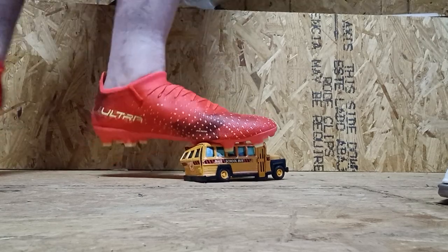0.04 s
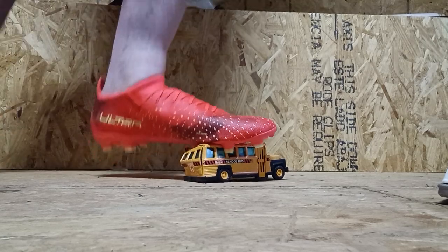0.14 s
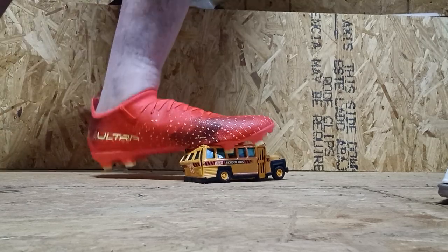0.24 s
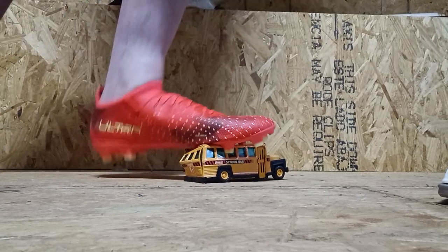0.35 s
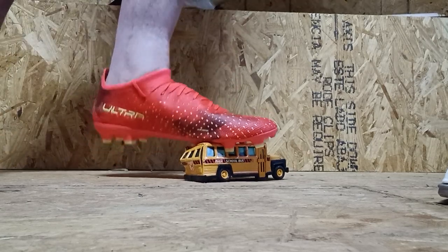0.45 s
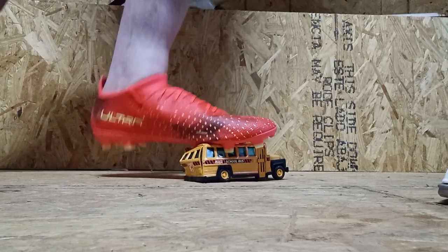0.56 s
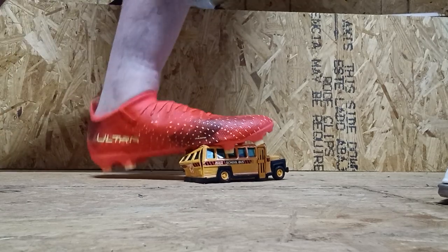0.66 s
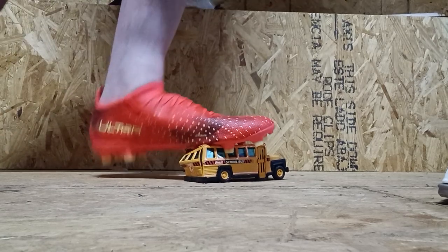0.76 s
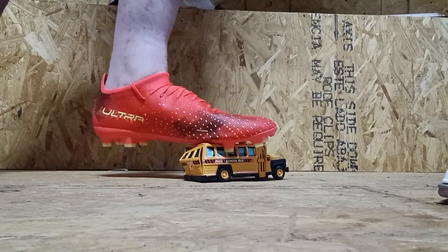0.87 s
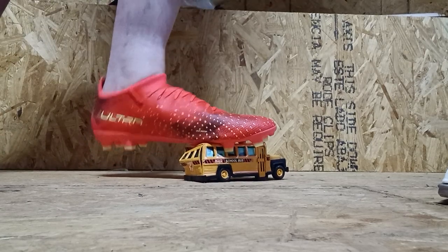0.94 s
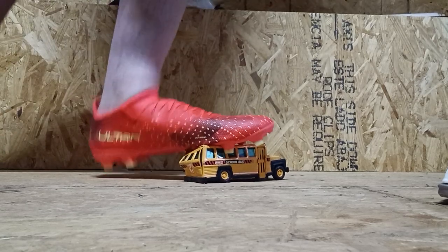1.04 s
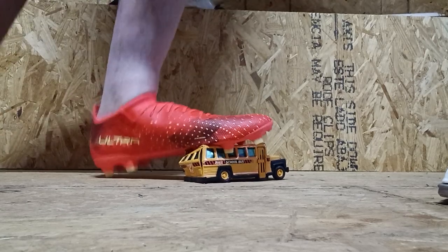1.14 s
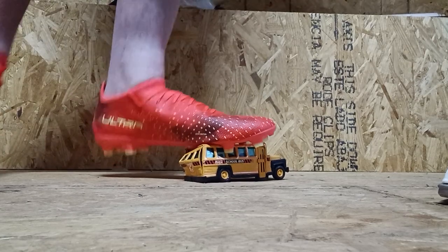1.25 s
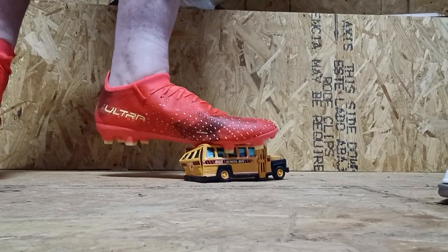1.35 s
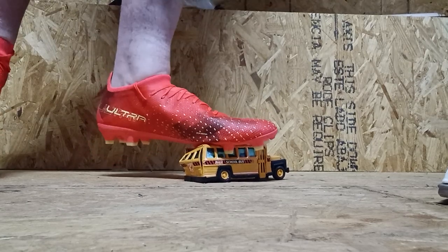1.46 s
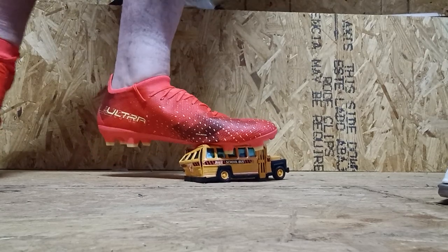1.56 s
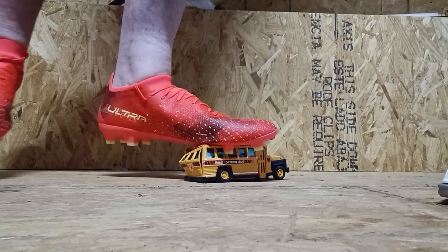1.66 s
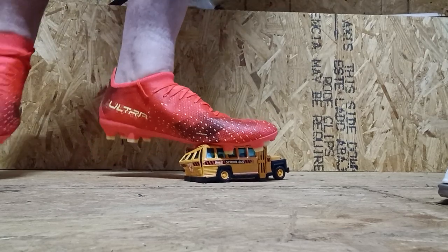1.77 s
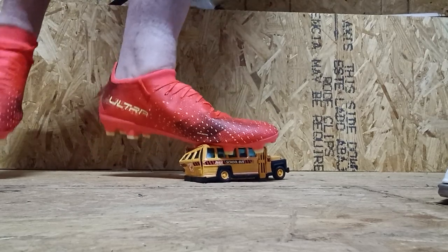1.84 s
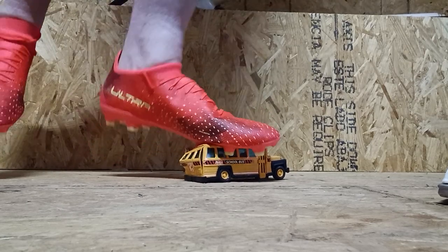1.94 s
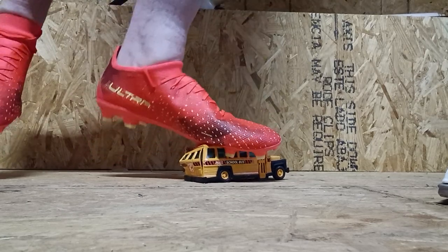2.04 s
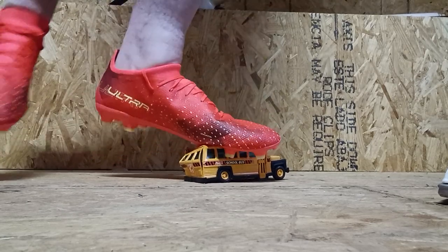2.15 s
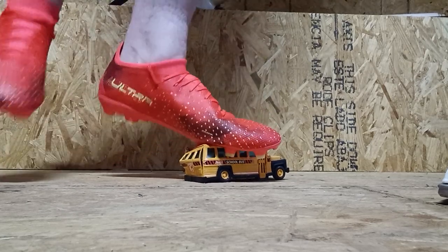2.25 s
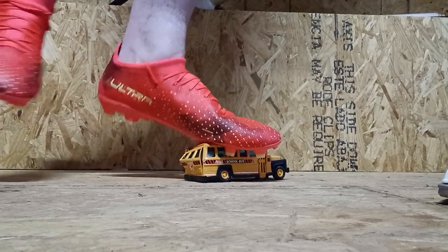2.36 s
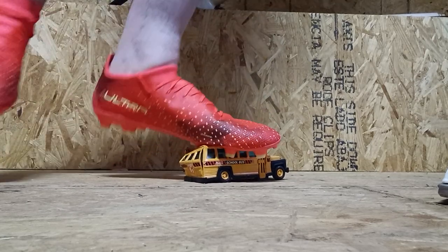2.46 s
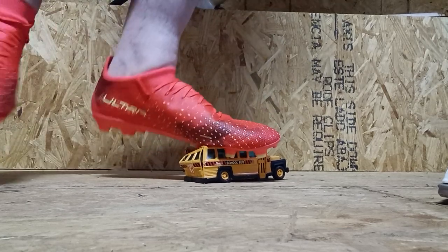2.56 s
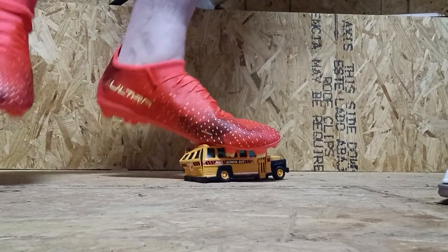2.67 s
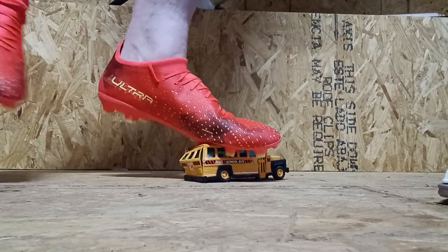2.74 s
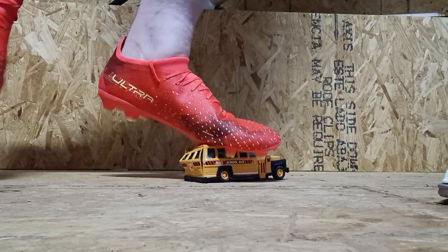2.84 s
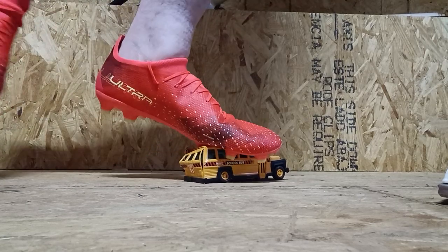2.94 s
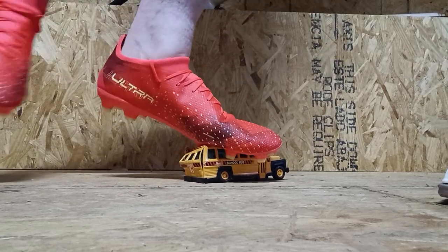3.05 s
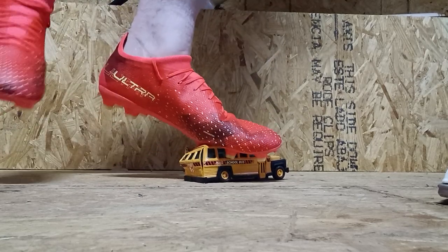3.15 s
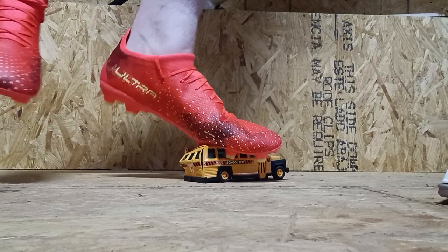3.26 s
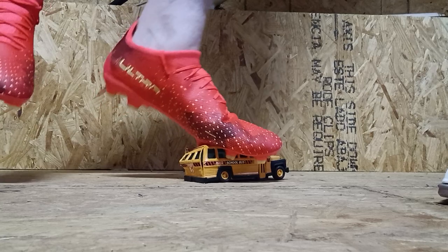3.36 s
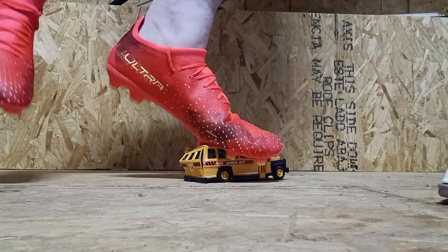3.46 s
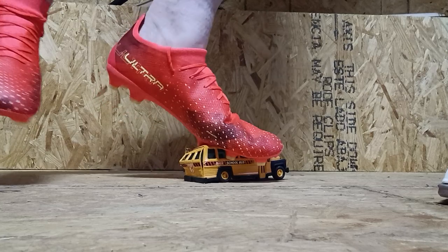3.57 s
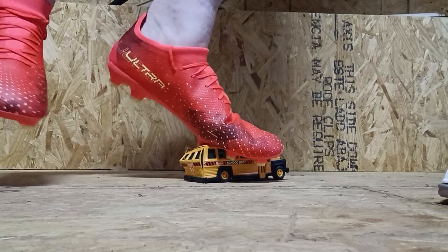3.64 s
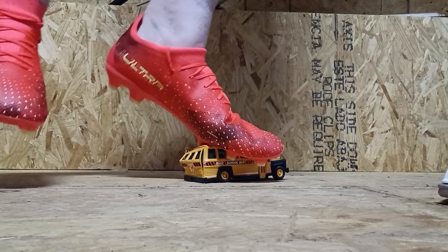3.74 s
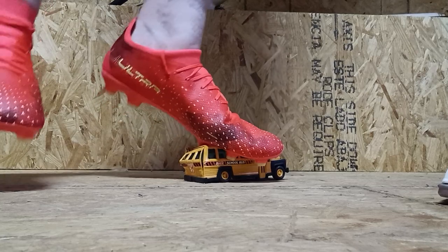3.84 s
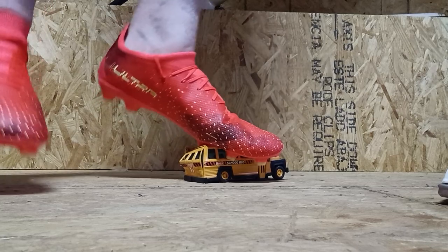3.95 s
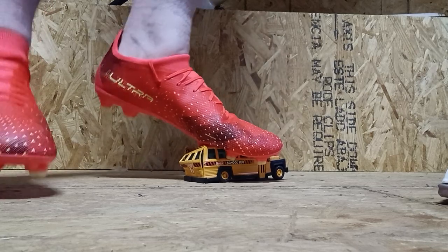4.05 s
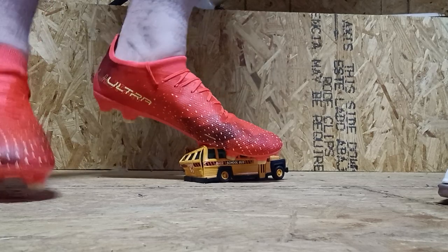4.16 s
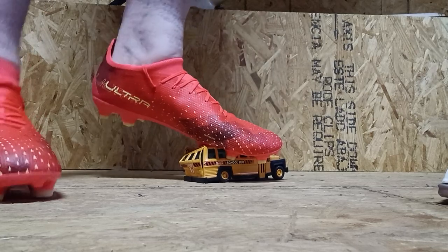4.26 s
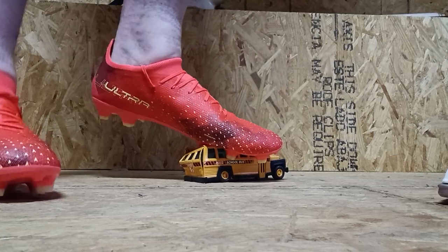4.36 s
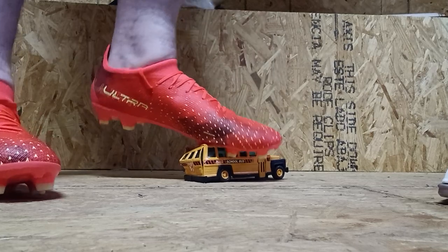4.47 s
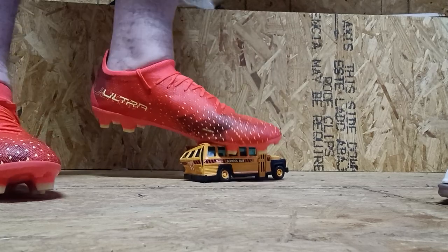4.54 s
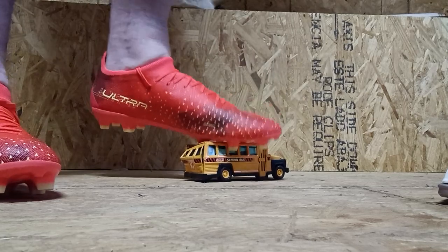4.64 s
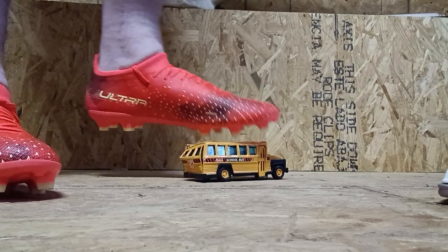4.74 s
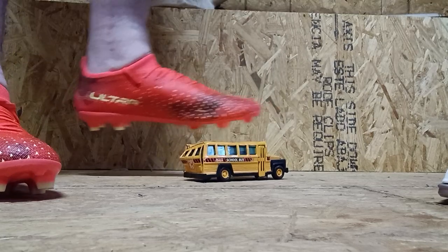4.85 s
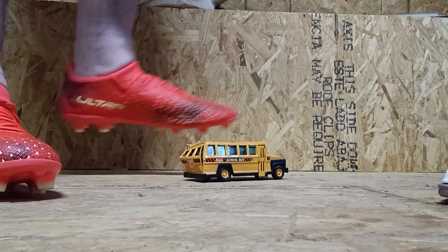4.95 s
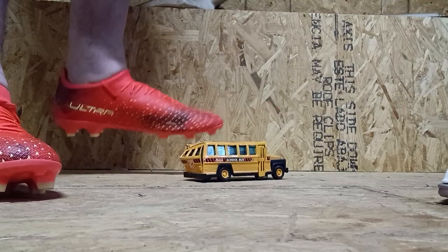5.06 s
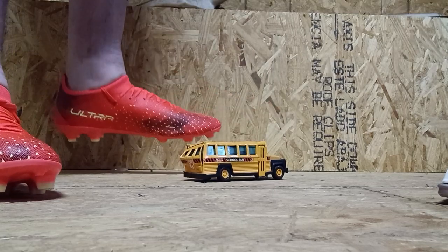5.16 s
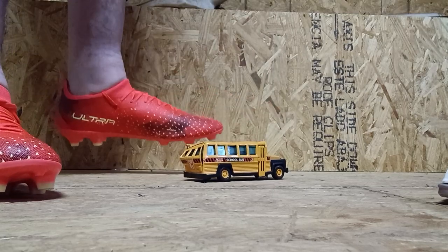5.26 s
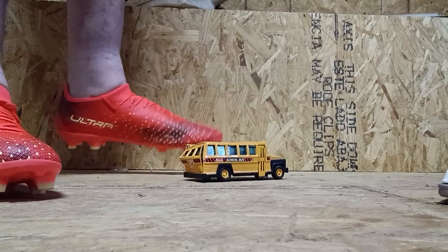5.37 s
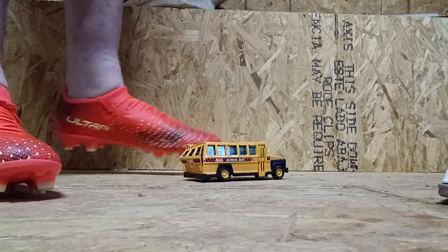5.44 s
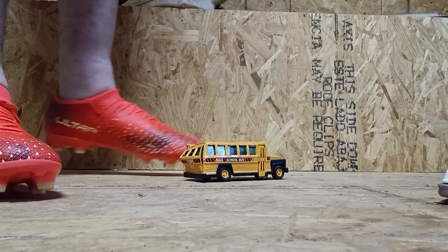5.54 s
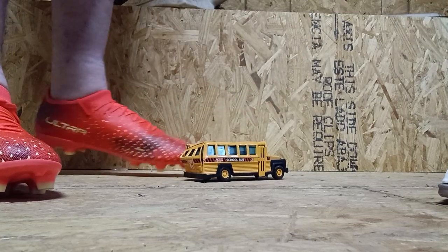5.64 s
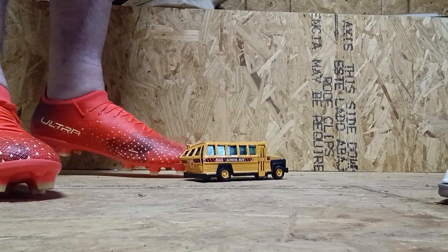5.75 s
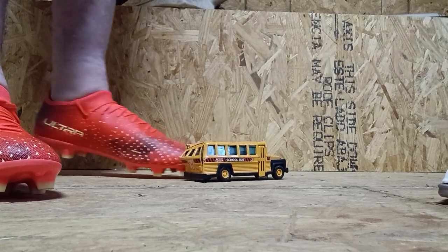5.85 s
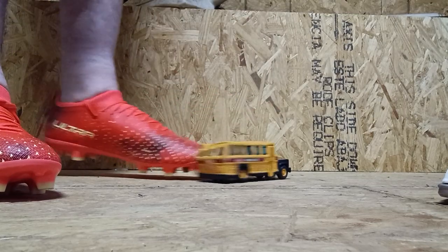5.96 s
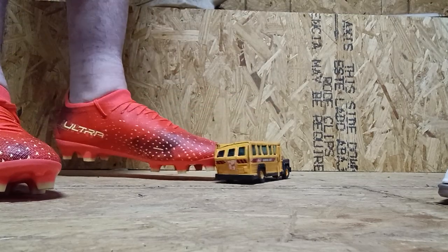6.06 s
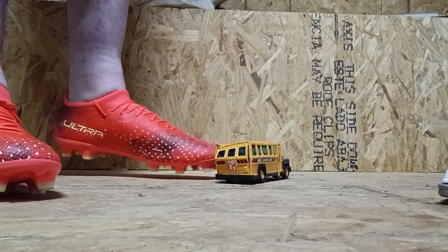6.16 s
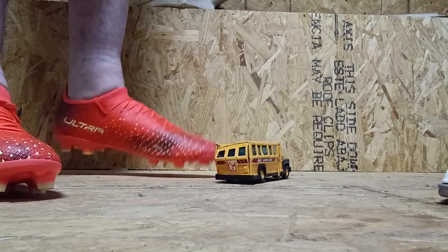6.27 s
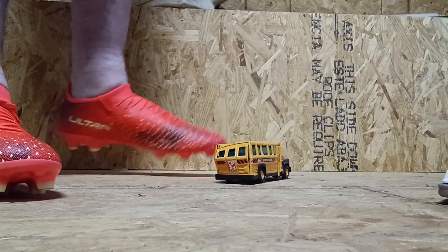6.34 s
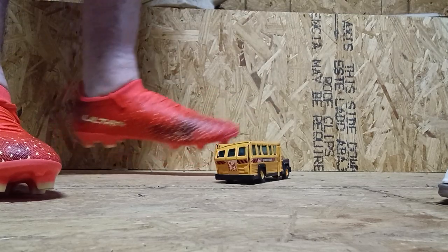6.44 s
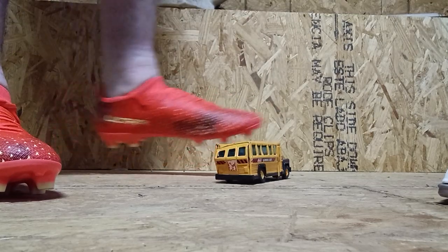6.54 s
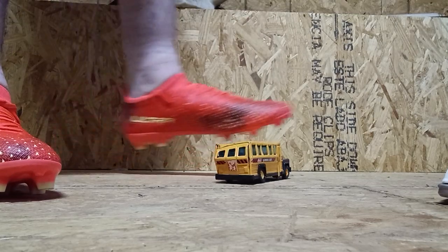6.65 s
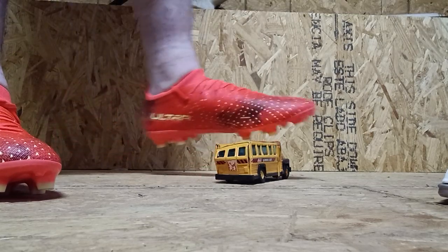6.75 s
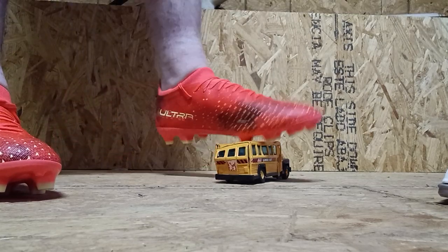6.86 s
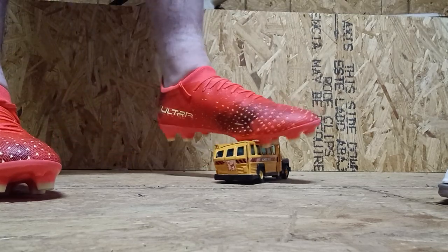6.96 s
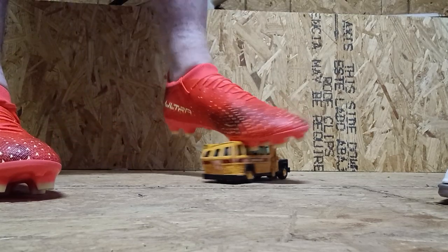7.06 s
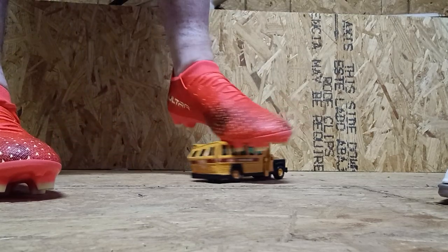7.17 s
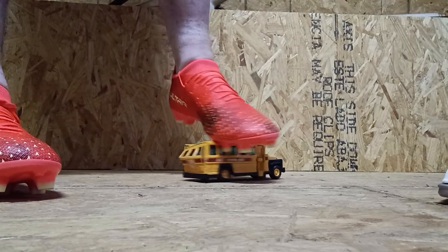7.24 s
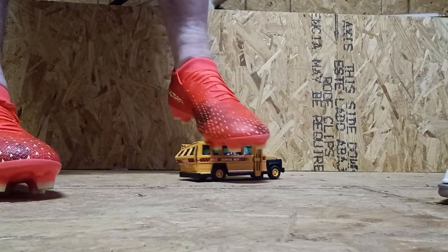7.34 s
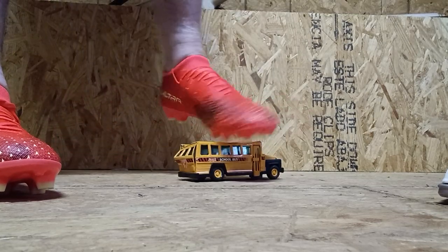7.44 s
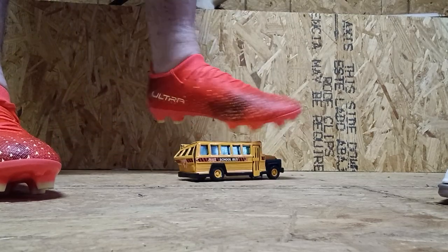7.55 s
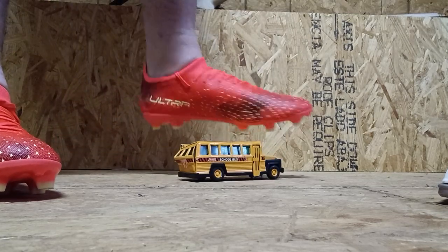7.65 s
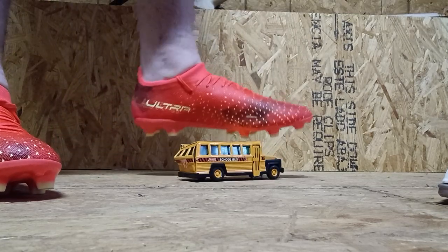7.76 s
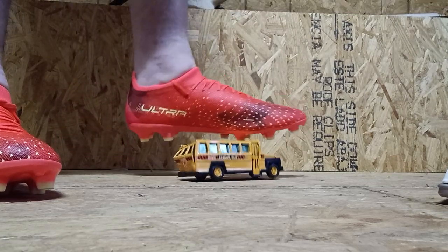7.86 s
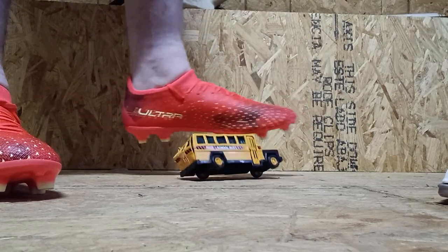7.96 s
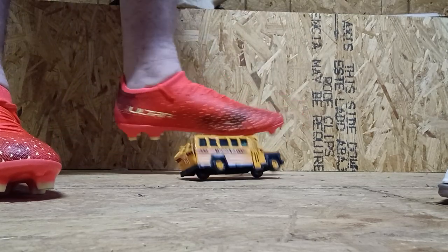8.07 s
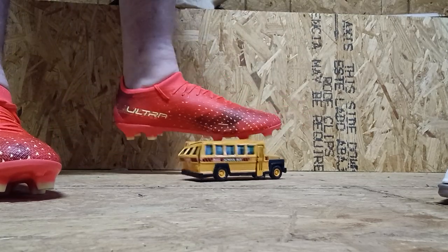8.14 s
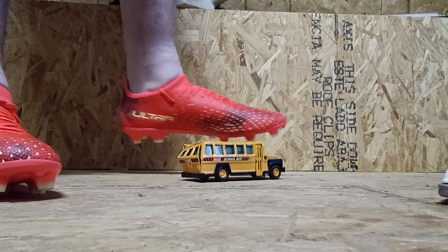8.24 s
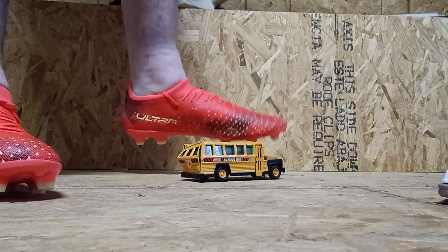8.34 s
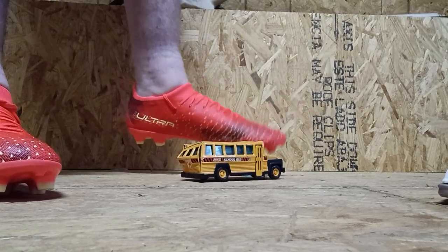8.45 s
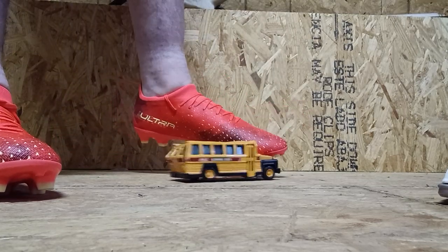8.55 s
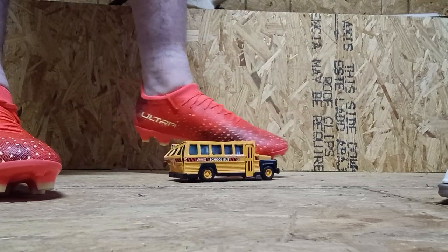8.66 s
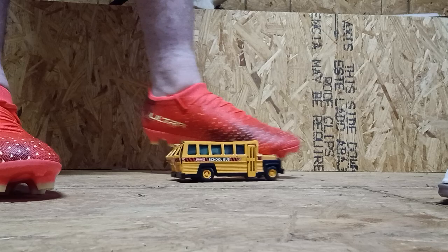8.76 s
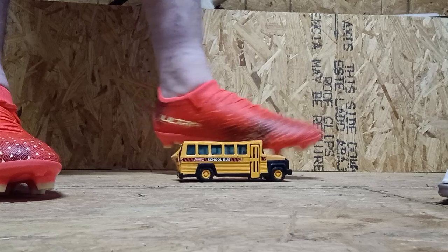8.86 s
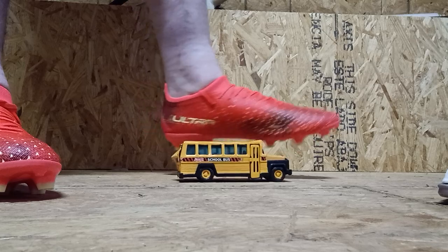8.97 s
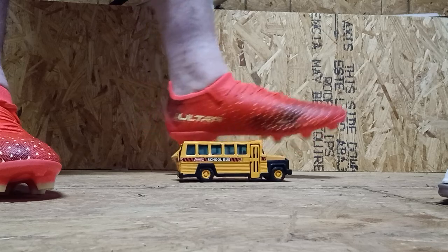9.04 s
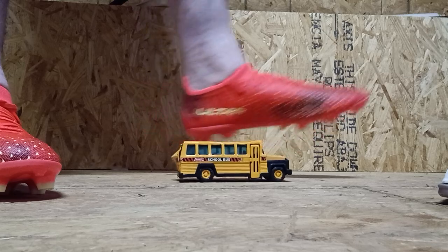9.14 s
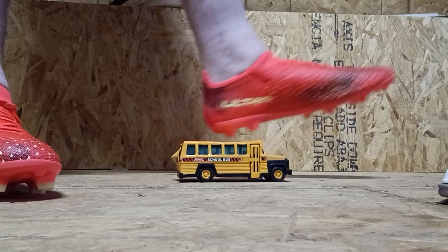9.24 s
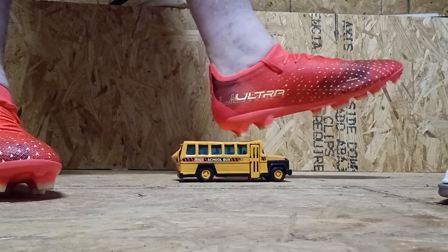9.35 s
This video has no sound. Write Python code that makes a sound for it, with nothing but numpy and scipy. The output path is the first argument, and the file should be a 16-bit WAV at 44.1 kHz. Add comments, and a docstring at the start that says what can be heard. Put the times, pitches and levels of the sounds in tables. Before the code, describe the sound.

A close stereo microphone in a narrow wooden room hears studded shoes working on a small hard toy bus on floorboards. From 0 to 0.8 s come irregular cracks, gritty grinding, tiny creaks and low thuds, strongest around 0.3 and 0.7-0.8. A heavy hollow thud lands at 1.2, then a dense crunchy flurry of knocks runs from 1.4 to 1.9. From 2 to 4.2 it is sparse: faint ticks, soft booms, a brief knock and creak near 2.9-3.2. A very strong thump hits at 4.3, with further knocks and a thud to 4.8. Near quiet follows, with a soft thump at 5.8. The loose toy scrapes and rattles at 6.0-6.15, thuds and drags at 7.0-7.4, then clatters brightly with thuds in bursts at 7.9-8.4, 8.6 and 8.8-9.0. Short dry reflections, faint hiss and a low wavering hum remain beneath.

```python
"""Studded shoes tread on, nudge and tip a small toy bus on a board floor in a narrow wooden room.
At first steps boom as fading low sine pushes, while studs crack and grind the pinned toy: bursts and slips of
noise ring its resonances, and gliding tones creak. From 5.5 s the foot has let go, and the loose toy scrapes
and clatters as it rocks, rolls and lands, between more thuds. Close reflections follow each sound;
faint background hiss in bands and a low, wavering hum lie below throughout."""
import sys
import numpy as np
from scipy import signal
from scipy.io import wavfile

SR = 44100
rng = np.random.default_rng(int(sys.argv[2]) if len(sys.argv) > 2 else 0)


def wav_out(sig):
    """Save sig, one row per channel (or a flat mono array), as 16-bit PCM at SR to the path in sys.argv[1]."""
    wavfile.write(sys.argv[1], SR, np.round(np.clip(np.atleast_2d(sig).T, -1, 1) * 32767).astype(np.int16))


N = 414518   # samples

# Studs knocking on the roof of the pinned toy. Each row: start in seconds, relative strength in dB,
# hardness (click over strength) in dB, contact t60 in seconds, pitch of the struck spot in Hz.
STUD_KNOCKS = [(0.0912, -23, -16, 0.02, 2380), (.108, -20, -19, 0.045, 2325),
               (0.151, -39, 17.5, 0.023, 1390), (.184, -40, 12, 0.026, 1430),
               (.2534, -22, -11.5, 0.023, 2370), (.268, -25.5, -10, 0.033, 2410),
               (0.3219, -6, -17.5, 0.012, 826), (0.3582, -15, -14.5, 0.033, 867),
               (0.4827, -17, -23, 0.012, 814), (.552, -13.5, -1, 0.029, 1507),
               (0.566, -28.5, 11, 0.01, 825), (0.7, -3, -16.5, 0.034, 860), (0.7636, -17.5, 6, 0.015, 3660),
               (0.7791, 2, -15, 0.011, 844), (0.9875, -21.5, 13, 0.016, 1570),
               (1.405, -24, -15.5, 0.02, 1140), (1.418, -19, -11.5, 0.01, 2030),
               (1.4744, -22, -15.5, 0.026, 820), (1.5587, -27, -13, 0.15, 850),
               (1.5977, -21, -5, 0.017, 1570), (1.6133, -13.5, -12, 0.015, 1460),
               (1.627, -18.5, -12.5, 0.054, 1430), (1.6575, -21.5, -10, 0.044, 1080),
               (1.679, -14.5, -14, 0.012, 850), (1.767, -12.5, -16, 0.035, 743),
               (1.824, -22.5, -3.5, 0.02, 1660), (1.8328, -12, -13, 0.032, 820),
               (1.8626, -8.5, -9, 0.0091, 1460), (1.8826, -22, -7, 0.051, 1420),
               (1.97, -29.5, -19, 0.043, 1970), (1.9842, -34.5, -15.5, 0.046, 2010),
               (2.0436, -34.5, -12, 0.073, 702), (2.1439, -48, -3, 0.087, 4500),
               (2.158, -40.5, -17, 0.029, 1410), (2.342, -37, -17.5, 0.051, 2390),
               (2.411, -33.5, -13.5, 0.059, 1705), (2.541, -37, -2, 0.048, 5410),
               (2.768, -36, -14.5, 0.085, 2070), (2.9394, -9.5, -49, 0.022, 655),
               (2.969, -47.5, 7.5, 0.023, 4580), (2.984, -22.5, -23, 0.045, 1455),
               (3.1604, -23, -9, 0.15, 1830), (3.33, -46, 23.5, 0.0028, 3350),
               (3.3883, -22, -18.5, 0.078, 674), (3.7194, -32.5, 1.5, 0.044, 1542),
               (4.327, -28.5, -30.5, 0.0092, 1285), (4.4561, -25, -14.5, 0.04, 1402),
               (4.4839, -7.5, -29, 0.025, 2334), (4.6743, -14.5, -13, 0.037, 1050),
               (4.759, -29, -13.5, 0.03, 3960)]
# The loose toy clattering as it rocks, rolls and lands. Each row: start in seconds, relative strength in dB,
# hardness (click over strength) in dB, contact t60 in seconds, pitch of the struck spot in Hz.
CLATTERS = [(5.9858, -22.5, -5, 0.078, 1400), (6.037, -34, -18, 0.032, 3900),
            (6.054, -16.5, -24, 0.058, 1460), (6.079, -17.5, -17, 0.07, 1047),
            (6.096, -18.5, -19, 0.045, 1285), (6.136, -19.5, -20, 0.028, 2000),
            (6.9904, -36, -11, 0.054, 1510), (7.1633, -16, -18, 0.054, 1874), (7.297, -30, -4, 0.033, 4380),
            (7.3684, -14, -11.5, 0.04, 1628), (7.9424, -21, -18, 0.029, 1530),
            (7.958, -24, -18.5, 0.051, 1854), (8.045, -36.5, -3, 0.083, 1530),
            (8.1663, -14.5, -38, 0.012, 1710), (8.1832, -34, -4.5, 0.079, 3840),
            (8.2388, -9, -9.5, 0.054, 1280), (8.27, -13.5, -9, 0.035, 1520),
            (8.331, -8.5, -12.5, 0.053, 1480), (8.351, -12.5, -16, 0.069, 3570),
            (8.377, -17.5, -13.5, 0.041, 1573), (8.6054, -10, -9, 0.035, 1460),
            (8.612, -12, -4, 0.024, 3850), (8.655, -9, -15.5, 0.039, 1450),
            (8.837, -17.5, -2.5, 0.052, 3750), (8.879, -14.5, -11, 0.045, 1540),
            (8.915, -15, -11, 0.044, 1870), (8.924, -11.5, -9, 0.028, 1385),
            (8.9484, -14, -7.5, 0.036, 1570)]
# Strokes of the toy grinding under the sole or sliding. Each row: start in seconds, rise in seconds,
# hold in seconds, relative level in dB, boards over level in dB, grit over level in dB.
SCRAPES = [(0.082, 0.014, 0.06, -33.5, -30, -7), (0.15, .01, 0.064, -57, -24, 13),
           (0.25, 0.0061, 0.082, -30.5, -1, -19.5), (0.49, 0.042, 0.035, -30.5, -11, -21.5),
           (0.538, 0.042, 0.061, -35, 6.5, 3), (0.702, 0.021, 0.017, -32.5, 4.5, -4.5),
           (0.787, 0.014, 0.075, -34.5, 6.5, 0.5), (0.899, 0.034, 0.029, -31, -17, -16.5),
           (1.011, 0.013, 0.061, -40.5, -3.5, 8), (1.103, 0.036, 0.028, -39.5, 8, -12),
           (1.307, 0.0066, 0.056, -35, -3, -52), (1.37, 0.068, 0.063, -36.5, 1.5, -12.5),
           (1.548, 0.041, 0.087, -38.5, 8.5, -18), (1.818, 0.049, 0.019, -34, 5, -4.5),
           (2.406, 0.0071, 0.015, -53.5, 21, -15), (2.523, 0.047, 0.059, -53, 7.5, -16),
           (2.945, 0.033, 0.026, -43.5, -5, -2.5), (3.152, 0.017, 0.0052, -32, -34, 0.5),
           (3.313, 0.014, 0.03, -50, -28, 12.5), (4.336, 0.032, 0.015, -50, 26.5, -38),
           (4.467, 0.031, 0.025, -48.5, 8, -7.5), (4.594, 0.045, 0.034, -40, 4.5, -25),
           (4.665, 0.0079, 0.011, -39.5, 7.5, 2), (5.981, 0.0058, 0.045, -28, 0, -8.5),
           (6.041, 0.038, 0.052, -24.5, -2, -10), (6.98, 0.01, 0.015, -33, 3.5, -12.5),
           (7.096, 0.06, 0.24, -30.5, -0.5, -10), (7.401, 0.02, 0.068, -48.5, 6.5, -18.5),
           (8.007, 0.041, 0.017, -46.5, 7, -13), (8.238, 0.0057, 0.042, -22.5, 6, -11.5),
           (8.312, 0.021, 0.07, -27.5, 2.5, -4.5), (8.607, 0.015, 0.066, -22.5, 1.5, -9.5),
           (8.832, 0.0047, 0.13, -27.5, -1.5, -4)]
# Rubbed spots singing at a gliding pitch. Each row: start in seconds, length in seconds, first pitch in Hz,
# last pitch in Hz, relative level in dB.
CREAKS = [(0.098, 0.038, 877, 937, -31), (0.12, 0.03, 423, 403, -34.5), (0.498, 0.0506, 355, 372, -33),
          (1.314, 0.013, 1140, 1120, -38), (1.346, 0.055, 378, 369, -36.5), (1.493, 0.04, 852, 855, -35.5),
          (1.558, 0.033, 432, 414, -32), (2.415, 0.053, 521.6, 380, -39), (2.771, 0.043, 728, 733, -42),
          (3.157, 0.0898, 296, 539, -35), (7.099, 0.091, 1456, 1924, -41), (7.502, 0.054, 461, 437, -47),
          (8.032, 0.053, 1285, 1580, -32.5)]
# Steps and drops on the boards. Each row: start in seconds, relative level in dB, pitch in Hz.
THUDS = [(0.023, -18, 393), (0.253, -16.5, 151), (0.562, -16, 167), (0.68, -19.5, 138), (0.779, -11.5, 203),
         (1.092, -23, 136), (1.2108, -4, 298), (1.244, -10, 171), (1.259, -16.5, 250), (1.661, -10.5, 362),
         (1.831, -18, 280), (2.172, -24.5, 140), (2.204, -30, 131), (2.34, -34, 170), (2.414, -23.5, 320),
         (2.569, -19, 147), (2.94, -19.5, 194), (3.026, -27, 131), (3.39, -26, 159), (3.725, -39.5, 127),
         (4.3282, -0.5, 342), (4.468, -16, 149), (4.54, -23.5, 144), (4.598, -8.5, 197),
         (4.926, -29, 135.6), (4.964, -26.5, 130.5), (5.813, -21, 141), (6.988, -14, 123),
         (7.298, -10.5, 130), (7.945, -16, 137), (8.047, -24.5, 140), (8.241, -8, 184), (8.334, -9.5, 191),
         (8.605, -7, 385), (8.924, -19, 121), (8.992, -23, 122)]
# Resonances of the floor boards, then of the toy: its shell, its windows, its bright click and its
# topmost tick. Each row: pitch in Hz, width in Hz, relative level in dB.
BOARD_MODES = [(79.5, 23, -9), (133.1, 13, 0), (194, 37, 0), (265, 63, -5.5), (302, 28.4, 2),
               (393, 67, -2.5)]
SHELL_MODES = [(506.7, 130, 1.7), (710, 66, 4), (886, 61, 4.6), (1062, 47, 3), (1214, 39, 1)]
WINDOW_MODES = [(1367, 180, -0.5), (1539.4, 93, 2.5), (1755, 190, -1.5), (2021, 160, -0.5),
                (2373, 87, -4.5)]
CLICK_MODES = [(2868, 200, 5), (3275, 82, 5.5), (3580, 100, 5.5), (3977, 140, 7), (4456, 290, 5.5),
               (5360, 600, 0), (6230, 710, 0.5)]
TICK_MODES = [(7560, 360, -10.5), (10050, 1100, -9.5), (15490, 5200, -14.5)]
# The resonance of the hum. Each row: pitch in Hz, width in Hz, relative level in dB.
HUM_MODES = [(101, 17, 0)]
# Course of the hum. Each row: time in seconds, level in dB.
HUM_LEVELS = [(4.1, -79), (5.3, -68), (6.8, -70), (9.4, -74)]
# Spectrum of the background hiss. Each row: frequency in Hz, relative level in dB.
HISS_SPECTRUM = [(30, -18.5), (70, -14.5), (98, -7.5), (212, -9.5), (420, -11.5), (792, -13), (1700, -8),
                 (6050, -27.5), (12500, -62), (15200, -36.5), (16500, -59.5)]
# Stereo likeness of the background hiss. Each row: frequency in Hz, left-right likeness from -1 to 1.
HISS_LIKENESS = [(60, 0.85), (240, 0.05), (950, -0.46), (3770, -0.14), (15000, 0.7)]

STUD_SHELL_DB, STUD_TICK_DB = -6, -6.5   # shell over strength, tick over click
CLATTER_SHELL_DB, CLATTER_TICK_DB = -9, -15.5
TICK_PER_HARDNESS = 0.48   # harder contacts gain the tick faster than the click
SNAP_DB, RATTLE_DB = -11, -0.5   # the first sharp blow and the rattle after it, over the energy of the contact
RING_DB, RING_SHARE, RING_CLICK_DB = -8.5, 0.53, 0   # over strength, share of contact t60, lift among the clicks
RISE_DB = (12, 17.5, 19.5)   # climb during a scrape's rise: boards, shell, grit
RELEASE_DB_PER_S = (233.5, 304, 326.5)   # boards, shell, grit
TAIL_DB, TAIL_SLOWER = -20, 0.44   # a weaker tail dies at this share of the release rate
LOOSE_FROM_S = 5.5   # the foot lets go of the toy
LOOSE_SHELL_DB, LOOSE_BOARDS_DB_PER_OCTAVE = -6, -7   # a sliding toy stirs shell and higher board modes less
CREAK_WAVER_HZ, CREAK_OCTAVE_DB = 79, -11.5
APART_ABOVE_HZ = 1600   # above this the ports hear different mixes of the toy's parts
LEFT_LAG = 3   # samples
ROOM_T60_S, WALL_CUT_HZ, ROOM_DB, ALIKE_BELOW_HZ = 0.21, 13400, -13, 220
HISS_DB = -58
CUTOFF_HZ = 17000


def knocks():
    """Each contact is a sharp blow and a burst of rattling force; most stiffer parts get a shorter share of it."""
    start, strength_db, hard_db, t60, _, shell_db, tick_db = contacts()
    click_db = strength_db + hard_db
    # modes, share of t60, contact cut in Hz, dB per contact
    parts = [(WINDOW_MODES, 0.9, 3500, 0.5 + strength_db),
             (SHELL_MODES, 1.1, 2500, 2.0 + strength_db + shell_db),
             (CLICK_MODES, 0.8, 12000, 8.5 + click_db),
             (TICK_MODES, 0.7, 20000, 7.0 + click_db + TICK_PER_HARDNESS * hard_db + tick_db)]
    rattle = amp(RATTLE_DB + drift(100))   # loose parts make the force uneven
    t = np.arange(SR // 6) / SR
    rise = 1 - np.exp(-t / 0.00083)

    def spot(hz):
        """The struck spot favours the modes near its pitch; the rest vary by chance."""
        near, latest = near_spot(hz, width=0.04)
        return amp(13.0 * near + 2.0 * rng.standard_normal(len(start)))[latest]

    out = 0
    for modes, share, cut_hz, part_db in parts:
        burst, snap = np.zeros((2, N + SR))
        for s, db, contact_s in zip(start, part_db, t60):
            i = round(s * SR)
            ring_s = max(share * contact_s, 0.003)
            burst[i:i + len(t)] += rise * amp(db - 60 * t / ring_s)
            # one sample carries a blow in proportion to the energy of the burst
            snap[i + 2] += amp(db + SNAP_DB) * np.sqrt(ring_s * SR / (2 * np.log(1000)))
        rattling = burst[:N] * rattle * rng.standard_normal(N)
        force = snap[:N] + two_ports(rattling, apart=2.1)
        out = out + body(soft(force, min(cut_hz, 0.47 * SR)), modes, spot)
    return out


def rings():
    """The struck spot rings on briefly at its own pitch, as a decaying sine."""
    out, t = np.zeros(N + SR), np.arange(SR // 6) / SR
    rise = 1 - np.exp(-t / 0.0027)
    for s, strength_db, hard_db, t60, hz, _, _ in contacts().T:
        among_clicks = hz > WINDOW_MODES[-1][0] * 1.1
        db = strength_db + RING_DB + (hard_db + RING_CLICK_DB) * among_clicks
        i = round(s * SR)
        decay = amp(db - 60 * t / (RING_SHARE * t60))
        out[i:i + len(t)] += rise * decay * np.sin(2 * np.pi * hz * t)
    return out[:N] * amp(2.5 * np.array([drift(60), drift(60)]))


def contacts():
    """Both kinds of knock as columns in time order, with their shell and tick levels added."""
    rows = [(*row, STUD_SHELL_DB, STUD_TICK_DB) for row in STUD_KNOCKS]
    rows += [(*row, CLATTER_SHELL_DB, CLATTER_TICK_DB) for row in CLATTERS]
    return np.transpose(sorted(rows))


def near_spot(hz, width):
    """How near a mode lies to each contact's pitch, 0-1, and which contact came last at each sample."""
    start, spot_hz = contacts()[[0, 4]]
    near = np.exp(-(np.log(hz / spot_hz) / width) ** 2)
    latest = np.maximum(np.searchsorted(start * SR, np.arange(N)) - 1, 0)
    return near, latest


def scrapes():
    """One stream of slips drives boards, shell and bright parts; the grittier it is, the more the windows buzz."""
    boards_gain, shell_gain, grit_gain = strokes()
    slips = grit(per_s=3500, spread_db=3.0)
    toy = two_ports(slips, apart=1.8)
    buzz = grit_gain / (grit_gain + amp(-3.0) * shell_gain)
    loose = np.arange(N) > LOOSE_FROM_S * SR

    def shifting(hz):
        """The load rests near the spot last touched and wanders over the toy."""
        near, latest = near_spot(hz, width=0.25)
        return amp(5.4 * near[latest] + 2.73 * drift(14))

    def sliding(hz):
        """The loose toy stirs the higher board modes less."""
        octaves = max(np.log2(hz / BOARD_MODES[2][0]), 0)
        return amp(LOOSE_BOARDS_DB_PER_OCTAVE * octaves * loose)

    shell = np.sqrt(1 - buzz) * body(soft(toy, cut_hz=3300), SHELL_MODES, shifting)
    windows = np.sqrt(buzz) * body(toy, WINDOW_MODES, shifting)
    bright_modes = CLICK_MODES + [(hz, width, db - 21.5) for hz, width, db in TICK_MODES]
    boards = body(soft(slips, cut_hz=1900), BOARD_MODES, sliding)
    bright = body(toy, bright_modes, shifting)
    dull = amp(LOOSE_SHELL_DB * loose) * shell + windows
    return boards_gain * boards + shell_gain * dull + grit_gain * bright


def strokes():
    """Gains of boards, shell and grit: every stroke rises, holds and dies away."""
    levels, t = np.full((3, N + SR), 1e-9), np.arange(SR // 2) / SR
    onset = np.clip(t / 0.0022, 0, 1)
    for s, rise_s, hold_s, db, boards_db, grit_db in SCRAPES:
        climb = np.outer(RISE_DB, np.clip(1 - t / max(rise_s, 0.002), 0, 1))
        fall = np.outer(RELEASE_DB_PER_S, np.maximum(t - rise_s - hold_s, 0))
        part_db = db + np.c_[[boards_db, 0, grit_db]]
        release = amp(-fall) + amp(TAIL_DB - TAIL_SLOWER * fall)
        i = round(s * SR)
        levels[:, i:i + len(t)] += onset * amp(part_db - climb) * release
    return levels[:, :N]


def grit(per_s, spread_db):
    """Random stick-slip clicks of uneven size that come in clumps; rms 1."""
    sizes = amp(spread_db * np.minimum(rng.exponential(1, N), 3)) * rng.choice([-1, 1], N)
    slipping = rng.random(N) < per_s / SR
    return rms_one(sizes * slipping * amp(2.4 * drift(37)))


def creaks():
    """Rubbing sings: a wavering tone and its steady octave swell and fade along a straight glide."""
    out = np.zeros(N)
    waver = rms_one(soft(rng.standard_normal((2, N)), cut_hz=CREAK_WAVER_HZ))
    for s, length, from_hz, to_hz, db in CREAKS:
        i, u = round(s * SR), np.linspace(0, 1, round(length * SR))
        phase = 2 * np.pi * np.cumsum(from_hz + (to_hz - from_hz) * u) / SR
        a, b = waver[:, i:i + len(u)]
        tone = (1 + a) * np.sin(phase) + b * np.cos(phase)
        octave = amp(CREAK_OCTAVE_DB) * np.sin(2 * phase)
        out[i:i + len(u)] += amp(db) * np.sin(np.pi * u ** 0.78) * (tone + octave)
    return out


def thuds():
    """A push of a few cycles at its own pitch, a dull tap of the studs, then the boards shake on."""
    push, tap, shake = np.zeros((3, N + SR))
    t = np.arange(SR // 4) / SR
    for s, db, hz in THUDS:
        i = round(s * SR)
        cycles = t * hz
        swell = amp(db - 60 * cycles / 4.3) * (1 - np.exp(-cycles / 0.8))
        push[i:i + len(t)] -= swell * np.sin(2 * np.pi * cycles)
        tap[i:i + len(t)] += amp(db - 60 * t / 0.033)
        shake[i:i + len(t)] += amp(db - 60 * t / 0.11)
    noise = soft(rng.standard_normal((2, N)), cut_hz=730)
    studs = body(tap[:N] * noise[0], SHELL_MODES)
    boards = body(shake[:N] * noise[1], BOARD_MODES)
    return amp(12.0) * push[:N] + amp(-13.5) * studs + amp(-11.5) * boards


def room(x):
    """Six feedback delays a side between near walls, duller on every round."""
    out, dull = np.zeros((2, N)), np.exp(-2 * np.pi * WALL_CUT_HZ / SR)
    lags = (np.geomspace(0.0071, 0.023, 12) * SR).astype(int)
    for k, lag in enumerate(lags):
        loop, state = x.copy(), [0.]
        gain = amp(-60 * lag / SR / ROOM_T60_S)
        for i in range(lag, N, lag):
            back, state = signal.lfilter([gain * (1 - dull)], [1, -dull], loop[i - lag:i], zi=state)
            loop[i:i + lag] += back[:N - i]
        out[k % 2] += (loop - x) * (-1) ** (k // 2)
    return out


def hum():
    """Noise through one narrow low resonance, twice over, wavers like a hum; alike at both ports."""
    s, level_db = np.transpose(HUM_LEVELS)
    tone = body(body(rng.standard_normal(N), HUM_MODES), HUM_MODES)
    return amp(np.interp(np.arange(N) / SR, s, level_db)) * rms_one(tone)


def hiss():
    """Steady background noise in bands, each with its own level and left-right likeness."""
    out, edges = 0, 28 * 2 ** np.arange(0, 9.4, 0.4)
    white = rng.standard_normal((2, 2, N))   # neighbouring bands take turns with two noise pairs
    for k, (low, high) in enumerate(zip(edges, edges[1:])):
        band = signal.butter(2, [low, high], "band", fs=SR, output="sos")
        mid, side = signal.sosfilt(band, white[k % 2])
        hz = np.sqrt(low * high)
        alike = np.clip(at_hz(HISS_LIKENESS, hz), -1, 1)
        pair = np.sqrt(1 + alike) * mid + np.sqrt(1 - alike) * side * [[1], [-1]]
        out = out + amp(at_hz(HISS_SPECTRUM, hz)) * pair
    return amp(HISS_DB) * rms_one(out)


def body(x, modes, coupling=lambda hz: 1):
    """Parallel resonances with alternating signs, each driven as coupled; white noise of rms 1 stays near rms 1."""
    out, power = 0, 0
    for k, (hz, width, db) in enumerate(modes):
        r = np.exp(-np.pi * width / SR)
        poles = [1, -2 * r * np.cos(2 * np.pi * hz / SR), r * r]
        ringing = signal.lfilter([1, 0, -1], poles, coupling(hz) * x + 1e-18)
        out = out + (-1) ** k * amp(db) * (1 - r * r) / 2 * ringing
        power += amp(2 * db) * (1 - r * r) / 2
    return out / np.sqrt(power)


def two_ports(force, apart):
    """The short waves from the parts of a close object reach each port in a mix of its own."""
    own = force * (1 + apart * rng.standard_normal((2, N))) / np.hypot(1, apart)
    high = signal.butter(1, APART_ABOVE_HZ, "high", fs=SR, output="sos")
    return force + signal.sosfilt(high, own - force)


def soft(x, cut_hz):
    """A yielding contact passes little treble on: a low-pass."""
    return signal.sosfilt(signal.butter(2, cut_hz, fs=SR, output="sos"), x)


def drift(rate):
    """Slow chance of spread 1, about rate changes a second, drawn at every 40th sample."""
    r = np.exp(-2 * np.pi * rate * 40 / SR)
    slow = signal.lfilter([1], [1, -2 * r, r * r], rng.standard_normal(N // 40 + 2002))[2000:]
    return np.interp(np.arange(N) / 40, np.arange(len(slow)), rms_one(slow))


def at_hz(points, hz):
    """Read a (Hz, value) table on a log axis."""
    table_hz, values = np.transpose(points)
    return np.interp(np.log(hz), np.log(table_hz), values)


def rms_one(x):
    """Scale to rms 1."""
    return x / np.sqrt(np.mean(x ** 2) + 1e-20)


def amp(db):
    """dB to gain."""
    return 10 ** (np.asarray(db) / 20)


def scene():
    """The right port hears the near sounds first; long waves from the walls reach both ports alike."""
    near = knocks() + rings() + scrapes() + thuds() + creaks()
    left, right = amp(ROOM_DB) * room(near[1])
    high = signal.butter(1, ALIKE_BELOW_HZ, "high", fs=SR, output="sos")
    side = signal.sosfilt(high, left - right)
    wet = (left + right + side * [[1], [-1]]) / 2
    direct = np.array([np.roll(near[0], LEFT_LAG), near[1]])
    return direct + wet + hiss() + hum()


def record(dry):
    """The left port is weak in the bass and round 9.7 kHz; bass rolls off, peaks are rounded, the top is cut."""
    b, a = signal.iirpeak(9700, 1.8, fs=SR)
    dip = signal.lfilter(b, a, dry[0])
    bass = signal.sosfilt(signal.butter(1, 400, fs=SR, output="sos"), dry[0])
    left = amp(1.0) * (dry[0] - dip - 0.5 * bass)
    thin = signal.sosfilt(signal.butter(3, 70, "high", fs=SR, output="sos"), [left, dry[1]])
    rounded = 0.77 * np.tanh(thin)
    return signal.sosfilt(signal.cheby2(12, 70, CUTOFF_HZ, fs=SR, output="sos"), rounded)


dry = scene()
out = record(dry)
wav_out(out)
```